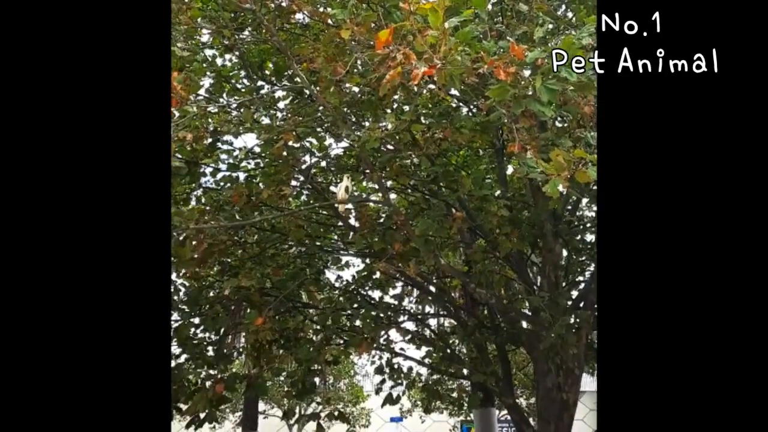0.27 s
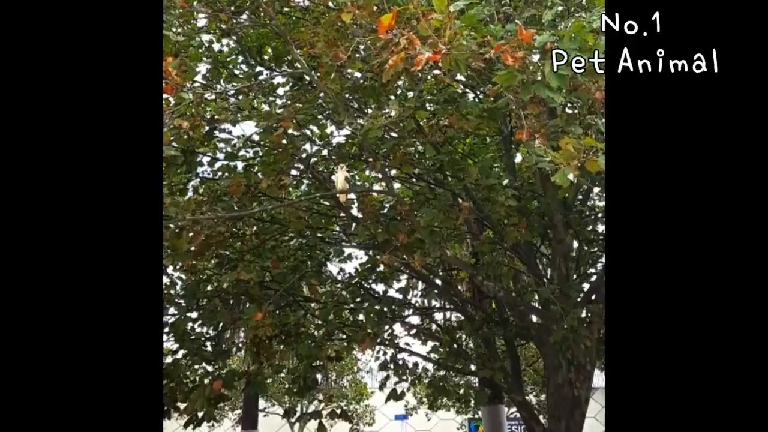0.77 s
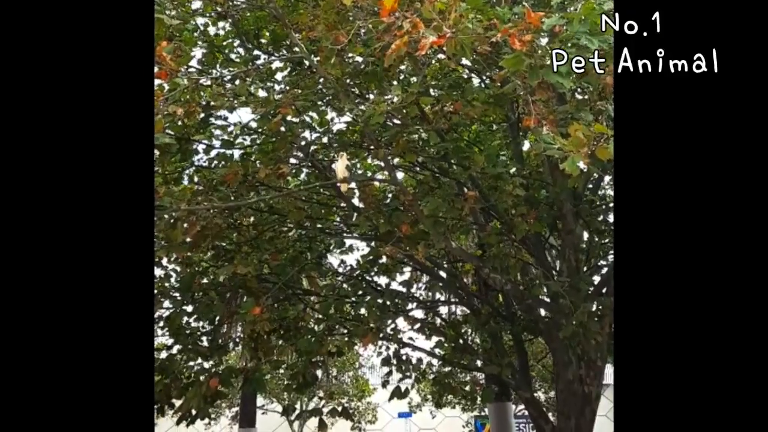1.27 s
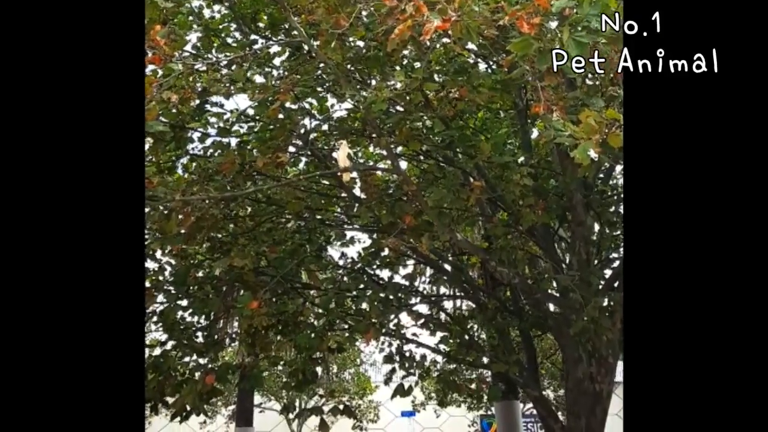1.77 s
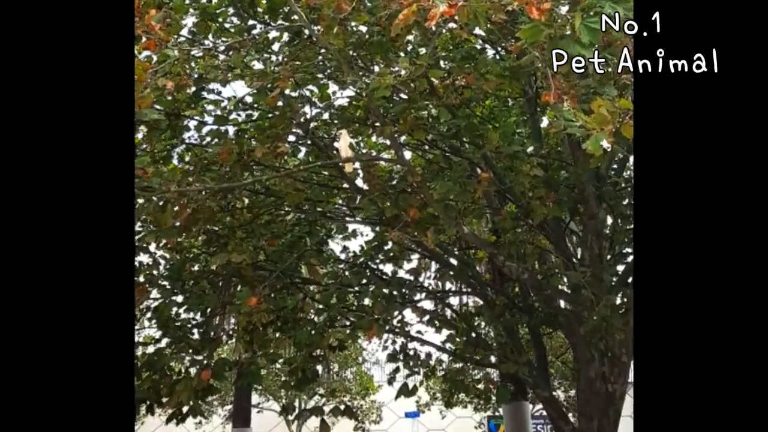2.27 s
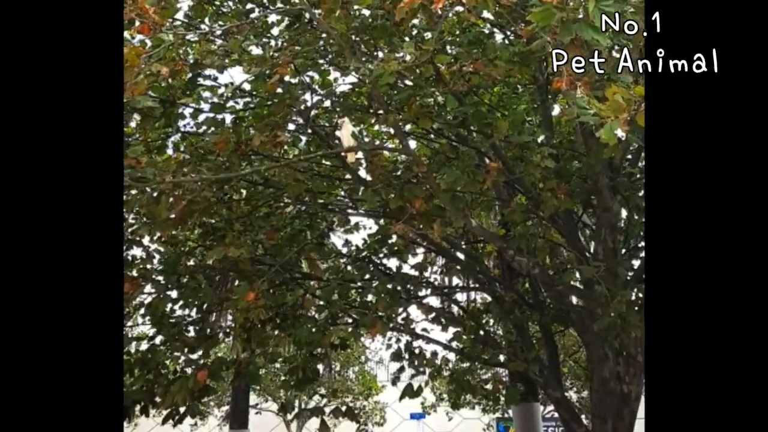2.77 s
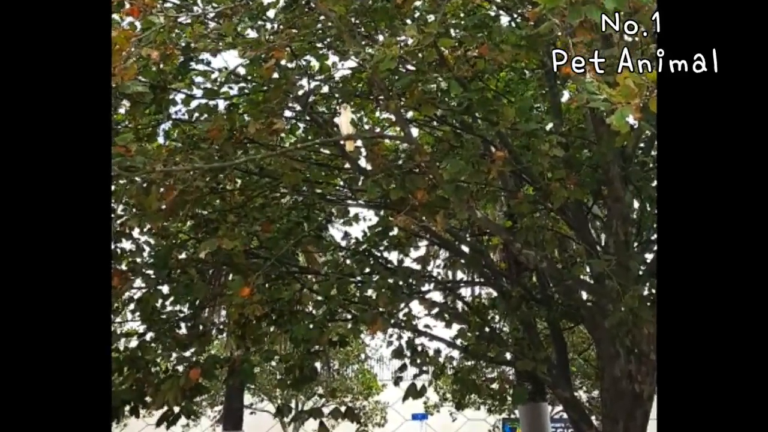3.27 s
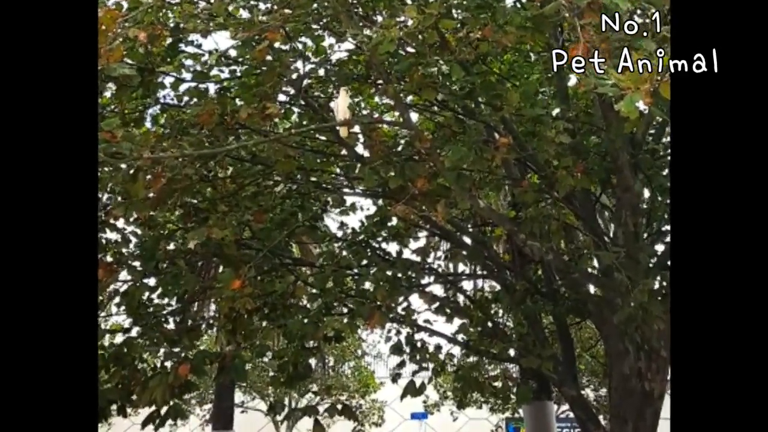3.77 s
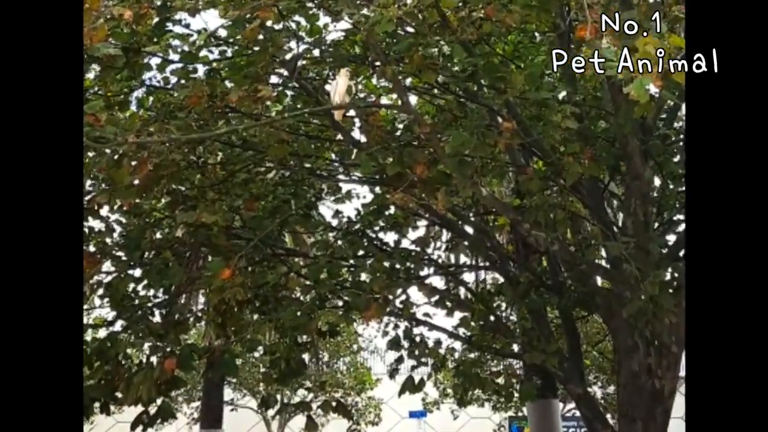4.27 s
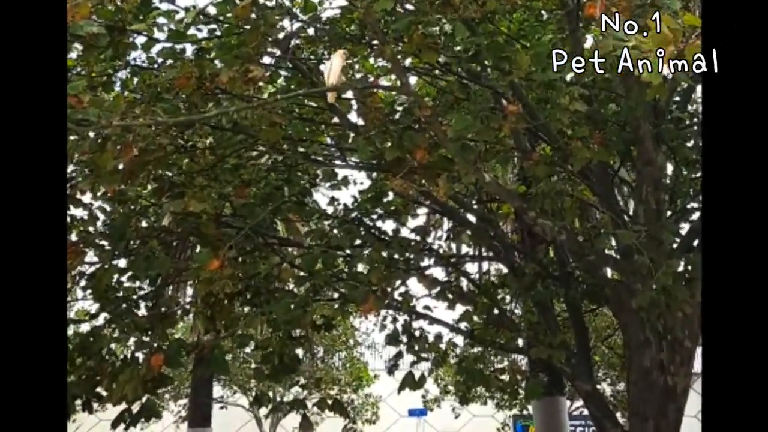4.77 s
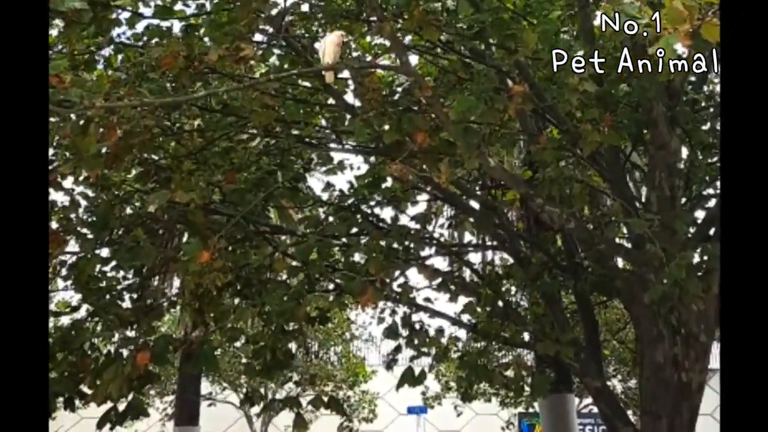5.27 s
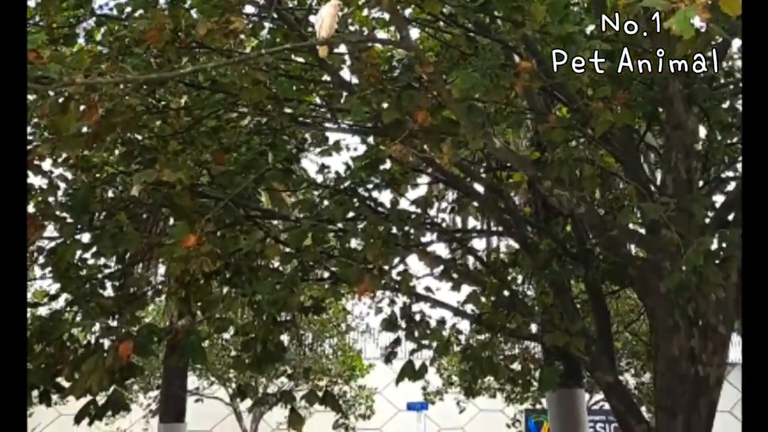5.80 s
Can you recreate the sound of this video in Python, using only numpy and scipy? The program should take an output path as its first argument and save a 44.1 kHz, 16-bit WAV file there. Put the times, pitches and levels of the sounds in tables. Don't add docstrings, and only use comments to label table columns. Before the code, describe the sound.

A large white parrot in a tree gives a loud, harsh, slightly falling screech right at the start, its echo fading among trees and walls. A distant engine hums and revs over steady traffic wash while wind thumps the left side. Near 3.7 seconds a hoarse run-up leads into a second screech. Faint small birds whistle and pipe near the end. Outdoor handheld stereo microphone.

```python
import sys
import numpy as np
from scipy import signal
from scipy.fft import rfft, irfft, next_fast_len
from scipy.io import wavfile
from scipy.ndimage import uniform_filter1d

SR = 44100
rng = np.random.default_rng(int(sys.argv[2]) if len(sys.argv) > 2 else 0)


def nominal_scale(level):
    x = np.asarray(level, float) / 20
    return 10 ** x


def master(y):
    cut = np.clip(np.atleast_2d(y).T, -1, 1)
    pcm = np.round(cut * 32767)
    wavfile.write(sys.argv[1], SR, pcm.astype(np.int16))


N = 266187

# time in seconds, effort in dB, beak opening in dB, windpipe coupling in dB.
FIRST_CALL = [(0, -22.5, 1, 8), (.026, -24.5, 3.5, 9.5), (.048, -19, -0.5, 10), (.17, -20.5, 1.5, 8.5),
              (.33, -24, 2.5, 15), (.39, -26.5, 5.5, 8.5), (.465, -31, -4.5, 6.5), (.5, -28.5, 1.5, 10.5),
              (.578, -30, -3.5, 13)]
SECOND_CALL = [(3.77, -28.5, -4.5, 12), (3.8, -25.5, 5, 6.5), (3.835, -22.5, 3.5, 13), (3.97, -24, 1.5, 13),
               (4.03, -26.5, 3, 10), (4.12, -28.5, -5.5, 13), (4.23, -28.5, -1, 15), (4.3, -34, -4.5, 10),
               (4.345, -20.5, -5, 13)]
RUN_UP_CALL = [(3.665, -62, -13, 8.9), (3.7, -37, -11.5, 18), (3.724, -28.5, -9.5, 21),
               (3.75, -31.5, -4, 17), (3.77, -29.5, -2.5, 14)]
# time in seconds, pitch in Hz.
VOICE_PITCH = [
    [(0.0, 656.6), (0.02, 669.4), (0.05, 753.8), (0.15, 752), (0.32, 697.7), (0.328, 676.9), (0.41, 650.1),
     (0.49, 637.0), (.555, 602)],
    [(3.67, 489.6), (3.678, 509.8), (3.7, 553.5), (3.742, 562.1), (3.76, 572.9)],
    [(3.775, 628), (3.829, 683), (3.925, 705.4), (3.937, 682.1), (3.961, 698.6), (3.981, 657.9),
     (4.045, 656.8), (4.105, 635.3), (4.322, 634)],
]
# start in s, length in s, roughness (0-1) at start, at end.
CHAOS_SPELLS = [(.026, .016, .12, .16), (.1, .205, .48, .32), (.316, .016, .25, .3), (.487, .11, .62, .5),
                (3.65, .118, .15, .4), (3.924, .012, .38, .38), (3.96, .014, .3, .3), (4.312, .05, .2, .5)]
CALM, FLIP_S, SETTLE_SHARE, SETTLE_S = .004, .008, .17, .04
COLLAPSE_S, COLLAPSE_SAG_HZ, COLLAPSE_DB = .025, 80, -13
BREATH_SHARE, SHAKE_RAD = .32, .6
SWELL_DB, SLIDE_RAD, FLUTTER_DB = 2.5, .45, 2.2
# frequency in Hz, gain in dB.
THROAT_RESPONSE = [(400, -33), (650, -20), (1300, -4), (2200, -7.5), (3400, -3), (4000, -7), (4500, -7),
                   (5500, -15), (6600, -4.5), (7500, -23), (8600, -19), (10500, -25.5), (12000, -34),
                   (14000, -32)]
# centre in Hz, width in Hz.
WINDPIPE_PEAK = (2230, 140)
# centre in Hz, width in Hz, depth in dB.
SIDE_CAVITY = (4020, 380, -18)
CAVITY_REST_HZ, CAVITY_FOLLOWS = 640, 4.5
BEAK_BAND_SHARE = [0, 0.45, 0.9, 1.2, 0.8]
# frequency in Hz, decay time to -60 dB in seconds.
ECHO_DECAY = [(500, 1.9), (1300, 1.1), (3300, 0.97), (6000, 0.57), (9000, .5), (15000, .3)]
ECHO_LUMPS_DB = 3.5
# frequency in Hz, left minus right in dB.
BIRD_SHADE = [(60, 19), (110, -4), (200, 3.5), (380, -5.5), (700, 1), (1290, 2), (2370, 1), (4380, -8),
              (8080, -3.5), (14900, -2)]
BIRD_LAG_S, TRAFFIC_LAG_S = 6e-5, 1.9e-4

# time in seconds, firing rate in Hz.
FIRING_RATE = [(0, 66.14), (1.05, 82), (1.35, 65.01), (2.2, 67.18), (2.45, 70.6), (3.18, 74.21),
               (4.6, 85.64), (5.2, 89.23), (5.65, 86.03), (6.04, 85.45)]
# middle in s, length in s, first order in dB, second in dB.
BOOM_SWELLS = [(0, .3, -40, -45.5), (0.446, .3, -43.5, -61), (0.924, 0.58, -44, -56),
               (1.449, 0.86, -44, -50), (2.098, 0.52, -58, -49), (2.508, 0.43, -38.5, -49),
               (3.004, 0.62, -36, -56.5), (3.745, 0.59, -37.5, -48), (4.04, 0.44, -36.5, -54.5),
               (4.354, 0.31, -44, -53), (4.747, 0.72, -34.5, -53), (5.93, .6, -38, -58)]
ENGINE_HIDDEN_DB = -59.5

# start in seconds, peak in dB, sharpness in dB.
WIND_BUFFETS = [(0.086, -26, -24), (0.169, -25.5, -34), (0.313, -25.5, -16.5), (0.507, -41, -8.5),
                (0.592, -26.5, -17), (0.696, -34, -15), (0.884, -29, -15), (1.526, -36.5, -23.5),
                (1.88, -36, -24), (2.284, -32.5, -22), (2.443, -36, -36), (2.656, -35.5, -23),
                (2.942, -38, -15), (3.103, -32.5, -11.5), (3.319, -35, -14), (3.525, -20.5, -17),
                (3.811, -31, -16), (4.617, -28, -32), (4.824, -34.5, -4), (5.41, -31, -25),
                (5.608, -35, -17), (5.845, -35.5, -22)]
# frequency in Hz, level in dB.
WIND_SPECTRUM = [(25, -35.5), (50, 2), (90, 5.5), (160, -5.5), (330, -19), (500, -34), (900, -57),
                 (2500, -110)]
# peak time in seconds, level in dB, build-up in seconds.
WIND_GUSTS = [(0, -34, .05), (.1, -25.5, 0.02), (.34, -37, 0.21), (0.759, -32, 0.32), (1.06, -34.5, 0.21),
              (1.6, -41, 0.2), (1.85, -36, 0.18), (2.0, -37, .05), (2.3, -39.5, 0.12),
              (2.491, -30.5, 0.046), (2.7, -38.5, 0.16), (2.95, -32, 0.026), (3.12, -45, 0.13),
              (3.33, -38, 0.095), (3.53, -39, 0.033), (3.81, -37.5, .05), (4.35, -38, 0.21),
              (4.648, -31, 0.063), (4.98, -41, 0.4), (5.6, -52, 0.36), (5.78, -42.5, 0.052)]
GUST_RISE_DB, GUST_FALL_DB_PER_S, LULL_DB = 13, 150, -47.5

# frequency in Hz, density in dB per Hz.
TRAFFIC_SPECTRUM = [(18, -38.5), (30, -12.5), (69, -1.5), (111, -1), (144, -9.5), (230, -17.5),
                    (314, -11.5), (453, -23), (870, -25), (1070, -29.5), (3470, -48.5), (6330, -48.5),
                    (8430, -54.5), (9360, -69), (15400, -70.5)]
TRAFFIC_DB = -43.5
# frequency in Hz, likeness (0-1).
TRAFFIC_LIKENESS = [(60, 0.87), (300, 0.95), (1000, 0.38), (3000, 0.36), (8000, 0.17), (15000, .3)]
# frequency in Hz, left minus right in dB.
ROAD_SHADE = [(60, 0.5), (700, 2), (2400, 1.5), (4400, -5), (8000, -9), (15000, -3)]
# time in seconds, level in dB.
WASH_LEVEL = [(0, -1), (1.0, -3), (1.4, -2), (1.9, 0), (2.95, 1), (4.6, 1), (5.4, -0.5), (5.7, 2),
              (6.04, 1.5)]
WASH_TREBLE_GAIN, WASH_TREBLE_DB = 1.6, 2.5

# start in seconds, length in seconds, pitch in Hz, bend in Hz, level in dB.
WHISTLE_NOTES = [
    (5.16, 0.445, 2000, 3, -67.5),
    (5.607, .07, 1985, 16, -67),
]
PIPE_NOTES = [
    (5.416, 0.054, 1670, -150, -53),
    (5.452, 0.043, 1510, -34, -57),
    (5.505, 0.053, 1495, 3, -65),
    (5.543, 0.085, 1524, -420, -52.5),
]
PIPE_SECOND_DB, BEND_POWER, BEND_LOSS_DB_PER_HZ = -9.5, 2.4, 0.1
PIPE_THROAT_HZ, PIPE_THROAT_WIDTH_HZ = 3000, 180
# peak time in s, half length in s, centre in Hz, width in Hz, level in dB.
RUSTLE_PUFFS = [(.97, 0.064, 6370, 502, -66.5), (1.871, .08, 5015, 5020, -68),
                (2.962, 0.033, 3450, 894, -62.5), (3.0, 0.09, 5460, 5000, -65), (5.244, .1, 3610, 80, -78),
                (5.604, 0.046, 4050, 1200, -66), (5.63, .04, 1480, 150, -57),
                (5.906, .07, 3760, 600, -67.5), (5.998, 0.083, 3900, 500, -70)]
# frequency in Hz, gain in dB.
PORT_CAVITY = [(8300, 0), (8800, -22), (9500, -22), (10100, 0)]


def call(rows, air_db, collapses):
    at = slice(int(rows[0][0] * SR), int(rows[-1][0] * SR))
    effort_db, beak_db, ring_db = [c[at] for c in in_time(rows)]
    pitch_hz = in_time(sum(VOICE_PITCH, []))[0][at]
    rough = chaos(at)
    size = len(rough)
    spent = collapses * np.clip(1 - np.arange(size)[::-1] / SR / COLLAPSE_S, 0, 1)
    pitch_hz = pitch_hz - COLLAPSE_SAG_HZ * spent
    effort_db = effort_db + COLLAPSE_DB * spent

    wobble = 1 + 0.0026 * drift(40, size) + 0.042 * rough * drift(90, size)
    phase = 2 * np.pi * np.cumsum(pitch_hz * wobble) / SR + SHAKE_RAD * rough * drift(500, size)
    cavity_hz, cavity_width_hz, cavity_db = SIDE_CAVITY
    cavity_hz = cavity_hz + CAVITY_FOLLOWS * np.clip(pitch_hz - CAVITY_REST_HZ, 0, 70)
    cavity_db = cavity_db * np.clip(1 - 2.2 * rough, 0, 1)
    pulses = 0
    for k in range(1, 25):
        wander_db = SWELL_DB * drift(9, size) + FLUTTER_DB * drift(45, size)
        port_db = 1.2 * np.array([drift(12, size), drift(12, size)])
        hollow_db = cavity_db * np.exp(-((k * pitch_hz - cavity_hz) / cavity_width_hz) ** 2)
        swell_db = min(k / 7.3, 1) * wander_db + port_db + hollow_db
        slide = SLIDE_RAD * np.sqrt(min(k / 5.0, 1)) * drift(8, size) * [[1], [-1]]
        pulses = pulses + nominal_scale(swell_db) * np.cos(k * phase + 0.078 * k * k + slide)

    breath = rng.standard_normal(size) * (1 + np.cos(phase))
    throb = rms_one(resonance(rng.standard_normal(size), hz=93.0, width_hz=50))
    shake = nominal_scale(3.4 * rough * drift(130, size)) * np.abs(1 + 0.47 * rough * throb)
    source = (rms_one(pulses) + (.002 + BREATH_SHARE * rough) * rms_one(breath)) * shake
    hz, width_hz = WINDPIPE_PEAK
    voiced = coloured(source + nominal_scale(ring_db) * resonance(source, hz, width_hz), THROAT_RESPONSE)

    shaped = 0
    edges = [300, 1700, 2400, 5400, 9300, 16500]
    for low, high, share, db in zip(edges, edges[1:], BEAK_BAND_SHARE, [2.5, -.3, 2.5, 5.5, air_db]):
        sos = signal.butter(3, [low, high], "band", fs=SR, output="sos")
        shaped = shaped + signal.sosfiltfilt(sos, voiced) * nominal_scale(db + share * beak_db)
    even = np.sqrt(uniform_filter1d(np.mean(shaped ** 2, axis=0), size=1000) + 1e-12)
    out = np.zeros((2, N))
    out[:, at] = shaped / even * nominal_scale(effort_db) * signal.windows.tukey(size, 300 / size)
    return out


def chaos(at):
    t, rough = np.arange(N)[at] / SR, CALM
    for s, length, first, last in CHAOS_SPELLS:
        end = s + length
        spell = np.interp(t, [s, s + FLIP_S, end - FLIP_S / 2, end + FLIP_S / 2], [0, first, last, 0])
        trace = SETTLE_SHARE * last * np.exp(-np.abs(t - s - length) / SETTLE_S) * (t > end - FLIP_S)
        rough = np.maximum(rough, np.maximum(spell, trace))
    return rough


def park(x):
    t = np.arange(int(1.3 * SR)) / SR
    sparse = rng.standard_normal((2, len(t))) * (rng.random((2, len(t))) < 700 / SR)
    glints = sparse * nominal_scale(-17 - 60 * t / .09)
    tail, edges = 0, 350 * 2 ** np.arange(0, 5.6, .5)
    for low, high in zip(edges, edges[1:]):
        noise = band(rng.standard_normal((2, len(t))), low, high)
        decay_db = -60 * t / at_hz(ECHO_DECAY, np.sqrt(low * high))
        tail = tail + noise * nominal_scale(decay_db + ECHO_LUMPS_DB * drift(28, len(t)))
    response = glints + nominal_scale(-49.5) * tail * np.clip(t / .02, 0, 1)
    response[:, 0] = 1
    return signal.fftconvolve(x, response, axes=1)[:, :N]


def engine():
    rate_hz, = in_time(FIRING_RATE)
    t, heard = np.arange(N) / SR, np.full((2, N), nominal_scale(ENGINE_HIDDEN_DB))
    for s, length, *db in BOOM_SWELLS:
        heard = heard + nominal_scale(np.array(db))[:, None] * np.exp(-(2.62 * (t - s) / length) ** 2)
    phase = 2 * np.pi * np.cumsum(rate_hz * (1 + .01 * drift(4, N))) / SR
    upper = np.sin(2 * phase) + nominal_scale(-13.5) * np.sin(3 * phase) + nominal_scale(-15.5) * np.sin(4 * phase)
    return np.sqrt(2) * (heard[0] * np.sin(phase) + heard[1] * upper) * nominal_scale(0.5 * drift(7.3, N))


def wind():
    noise = rms_one(coloured(rng.standard_normal((2, N)), WIND_SPECTRUM))
    lumps = nominal_scale(gusts_db() + 4.5 + 3.8 * drift(14, N)) * noise
    t = np.arange(2600) / SR
    shape = np.clip(t / 0.0087, 0, 1) * np.exp(-t / 0.012)
    for (s, peak_db, sharp_db), (turn, pace) in zip(WIND_BUFFETS, rng.random((len(WIND_BUFFETS), 2))):
        push = np.sin(2 * np.pi * ((110 + 60 * pace) * t + turn))
        push = push + nominal_scale(sharp_db) * np.sin(2 * np.pi * (330 * t + turn))
        i = int(s * SR)
        lumps[0, i:i + len(t)] += (nominal_scale(peak_db + 10) * shape * push)[:N - i]
    return lumps * nominal_scale([[1], [-18]])


def gusts_db():
    t, level_db = np.arange(N) / SR, LULL_DB
    for s, db, rise_s in WIND_GUSTS:
        loss_db = np.where(t < s, GUST_RISE_DB * (s - t) / rise_s, GUST_FALL_DB_PER_S * (t - s))
        level_db = np.maximum(level_db, db - loss_db)
    return level_db


def far_birds():
    out = np.zeros(N)
    for notes, second_db, edge in [(WHISTLE_NOTES, -40, .2), (PIPE_NOTES, PIPE_SECOND_DB, .6)]:
        for s, length, hz, bend_hz, db in notes:
            i, size = int(s * SR), int(length * SR)
            bend = bend_hz * np.linspace(0, 1, size) ** BEND_POWER
            phase = 2 * np.pi * np.cumsum(hz + bend) / SR
            lift = nominal_scale(second_db) / np.hypot(1, (2 * (hz + bend) - PIPE_THROAT_HZ) / PIPE_THROAT_WIDTH_HZ)
            note = nominal_scale(-BEND_LOSS_DB_PER_HZ * np.abs(bend)) * np.sin(phase) + lift * np.sin(2 * phase)
            swell = nominal_scale(2.0 * drift(45, N // 8)[:size]) * signal.windows.tukey(size, edge)
            out[i:i + size] += np.sqrt(2) * nominal_scale(db) * note * swell
    return out


def rustles():
    out = np.zeros((2, N))
    for s, length, hz, width_hz, db in RUSTLE_PUFFS:
        size = int(2 * length * SR)
        noise = band(rng.standard_normal((2, 9000)), hz - width_hz / 2, hz + width_hz / 2)
        puff = rms_one(noise)[:, -size:] * np.hanning(size)
        i = int((s - length) * SR)
        out[:, i:i + size] += nominal_scale(db) * puff[:, :N - i]
    return out


def traffic():
    low_db, = in_time(WASH_LEVEL)
    high_db = WASH_TREBLE_GAIN * low_db + WASH_TREBLE_DB
    out, together, edges = 0, drift(3, N), 28 * 2 ** np.arange(0, 8.6, .5)
    white = rng.standard_normal((2, 2, N))
    for k, (low, high) in enumerate(zip(edges, edges[1:])):
        mid, side = band(white[k % 2], low, high)
        hz = np.sqrt(low * high)
        alike = np.clip(at_hz(TRAFFIC_LIKENESS, hz), 0, 1)
        bright = np.clip(np.log2(hz / 700) / 2, 0, 1)
        gain = nominal_scale(low_db + bright * (high_db - low_db) + .7 * together + 0.71 * drift(3.6, N))
        out = out + gain * (np.sqrt(1 + alike) * mid + np.sqrt(1 - alike) * side * [[1], [-1]])
    return nominal_scale(TRAFFIC_DB) * rms_one(coloured(out, TRAFFIC_SPECTRUM))


def to_ports(pair, balance, lag_s):
    size = next_fast_len(N + 64)
    hz = np.fft.rfftfreq(size, 1 / SR)
    shade = nominal_scale(at_hz(balance, hz) / 2)
    ports = np.array([shade * np.exp(-2j * np.pi * hz * lag_s), 1 / shade])
    return irfft(rfft(pair, size) * ports, size)[:, :N]


def resonance(x, hz, width_hz):
    r = np.exp(-np.pi * width_hz / SR)
    poles = [1, -2 * r * np.cos(2 * np.pi * hz / SR), r * r]
    return signal.lfilter([(1 - r * r) / 2, 0, (r * r - 1) / 2], poles, x)


def band(x, low, high):
    return signal.sosfilt(signal.butter(2, [low, high], "band", fs=SR, output="sos"), x)


def coloured(x, spectrum):
    size = next_fast_len(x.shape[-1] + 4096)
    gain = nominal_scale(at_hz(spectrum, np.fft.rfftfreq(size, 1 / SR)))
    return irfft(rfft(x, size) * gain, size)[..., :x.shape[-1]]


def drift(rate_hz, size):
    step = max(1, int(SR / rate_hz / 30))
    r = np.exp(-2 * np.pi * rate_hz * step / SR)
    slow = signal.lfilter([1], [1, -2 * r, r * r], rng.standard_normal(size // step + 102))[100:]
    return np.interp(np.arange(size) / step, np.arange(len(slow)), rms_one(slow))


def rms_one(x):
    return x / np.sqrt(np.mean(x ** 2) + 1e-20)


def in_time(rows):
    s, *columns = np.transpose(rows)
    return [np.interp(np.arange(N) / SR, s, c) for c in columns]


def at_hz(points, hz):
    table_hz, values = np.transpose(points)
    return np.interp(np.log(np.maximum(hz, 1)), np.log(table_hz), values)


def scene():
    bird = call(FIRST_CALL, air_db=6, collapses=True)
    bird = bird + call(RUN_UP_CALL, air_db=6.5, collapses=False)
    bird = bird + call(SECOND_CALL, air_db=0, collapses=True)
    overhead = to_ports(park(nominal_scale(3.5) * bird + nominal_scale(1.0) * far_birds()), BIRD_SHADE, BIRD_LAG_S)
    road = to_ports(traffic() + engine(), ROAD_SHADE, TRAFFIC_LAG_S)
    return overhead + road + wind() + rustles()


def band_limit(x):
    return signal.sosfilt(signal.butter(12, 15520, fs=SR, output="sos"), x)


def record(dry):
    heard = coloured(dry, PORT_CAVITY) + nominal_scale(-75) * rng.standard_normal(dry.shape)
    cut = signal.sosfilt(signal.butter(2, 38, "high", fs=SR, output="sos"), heard)
    cut = cut * np.clip((N - np.arange(N)) / 500, 0, 1)
    return band_limit(0.77 * np.tanh(cut / 0.78))


dry = scene()
out = record(dry)
master(out)
```